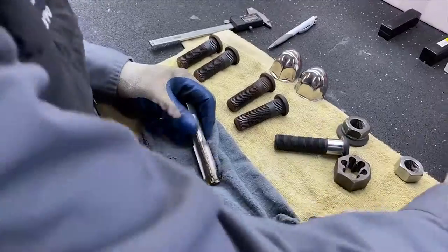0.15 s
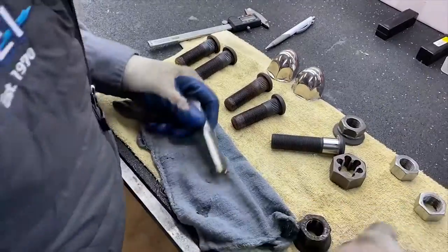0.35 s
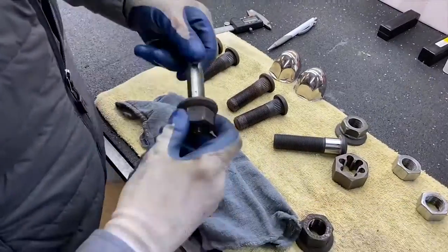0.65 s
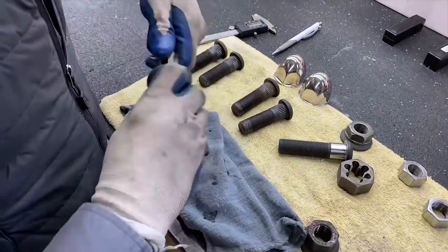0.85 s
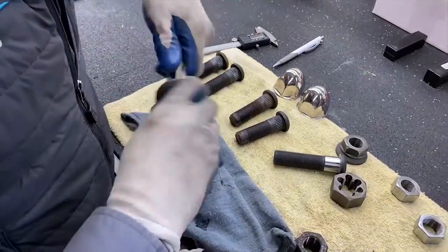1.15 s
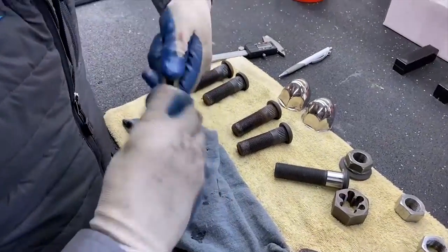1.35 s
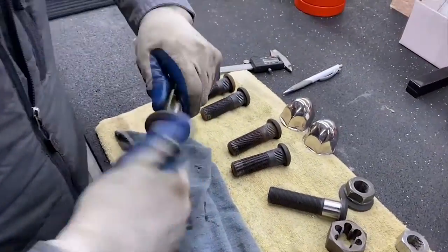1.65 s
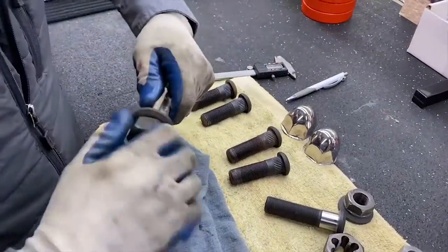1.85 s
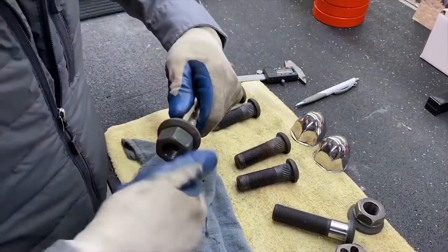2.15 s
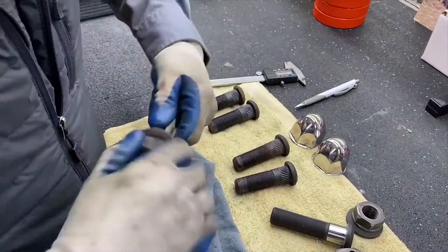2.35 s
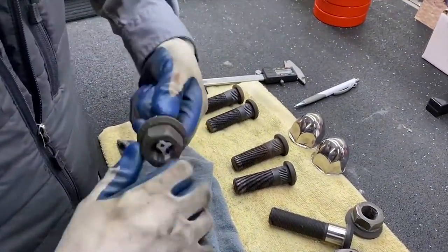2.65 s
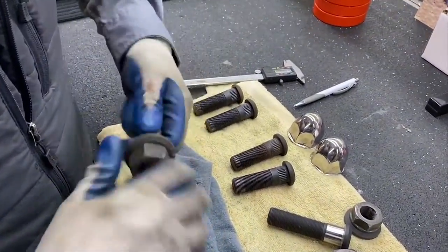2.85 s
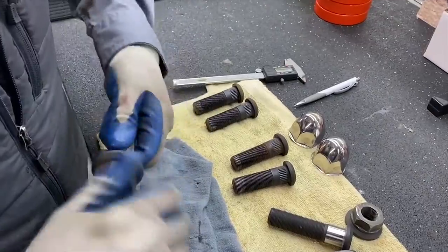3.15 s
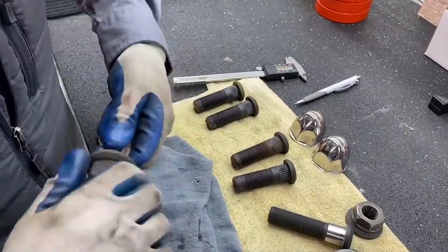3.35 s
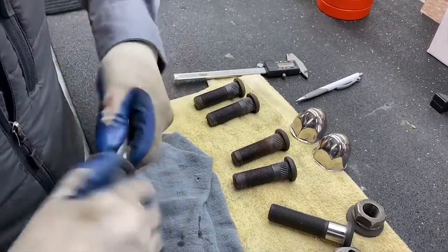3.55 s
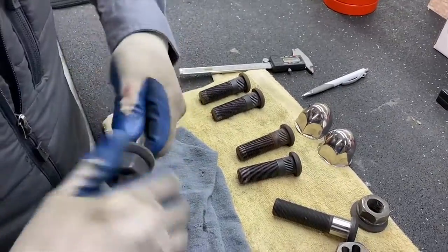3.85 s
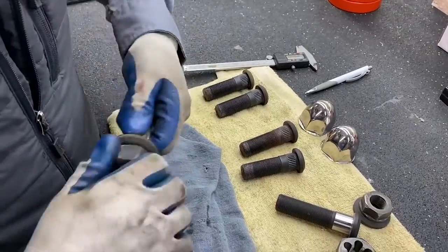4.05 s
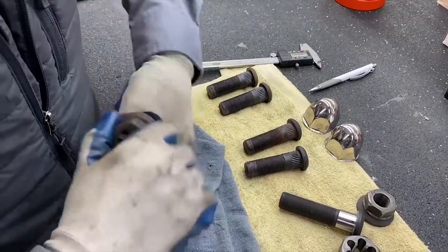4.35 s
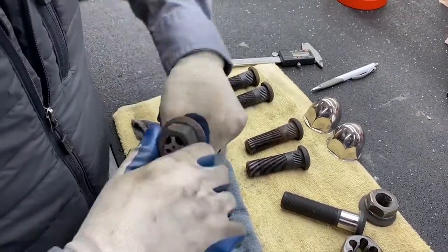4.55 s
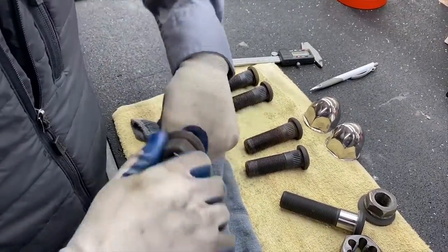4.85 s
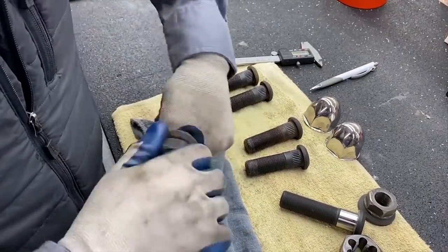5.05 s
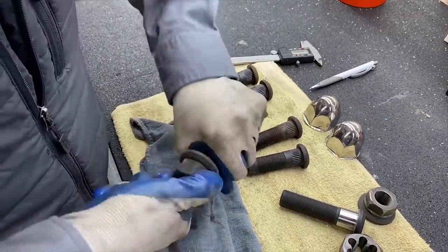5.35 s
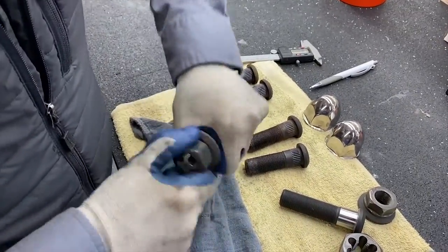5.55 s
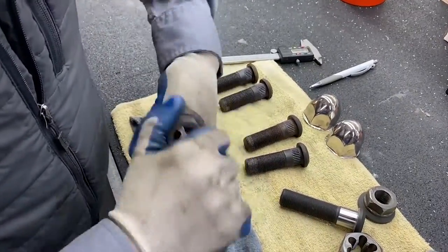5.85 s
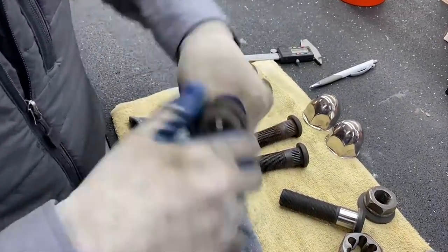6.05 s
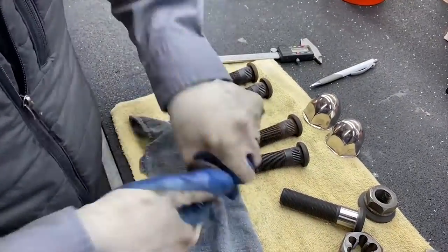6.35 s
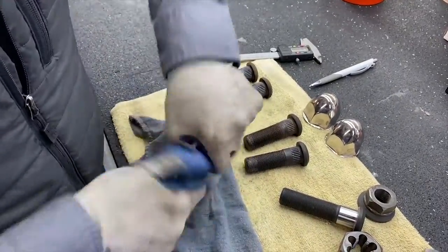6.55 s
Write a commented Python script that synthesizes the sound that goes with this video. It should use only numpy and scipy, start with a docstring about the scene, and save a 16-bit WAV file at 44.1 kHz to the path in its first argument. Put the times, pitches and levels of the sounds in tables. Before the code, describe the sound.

Close up in a workshop with steady ventilation, a glove ticks and a sleeve brushes by, then one dull bump lands on the workbench. A loose steel nut clinks twice against a thread tap and is turned by hand, making irregular damped clicks and short gritty scrapes. Gloves and sleeves swish and tick between the turns and carry on after the metal falls quiet.

```python
"""Gloved hands spin a steel nut along a thread tap over a cloth-covered workbench in a shop.
Over steady ventilation, a glove ticks, a sleeve brushes by and one dull bump bounces on the bench.
Then the loose nut knocks and grinds on the flutes, with one faint squeak; the grip damps the steel's
ring. Gloves and sleeves swish and tick between the turns and carry on after the steel falls quiet."""
import sys
import numpy as np
from scipy import signal
from scipy.fft import rfft, irfft
from scipy.io import wavfile
from scipy.ndimage import uniform_filter1d, minimum_filter1d

SR = 44100
rng = np.random.default_rng(int(sys.argv[2]) if len(sys.argv) > 2 else 0)


def put_to_file(sound):
    """Save the sound as 16-bit audio at rate SR, in the file named by the first command-line argument."""
    columns = np.atleast_2d(sound).T  # one column per channel
    safe = np.clip(columns, -1, 1)
    whole_steps = np.round(safe * 32767)
    wavfile.write(sys.argv[1], SR, whole_steps.astype(np.int16))


N = 295470


def amp(db):
    """Decibels to gain."""
    return 10 ** (np.asarray(db) / 20)


def unit(x):
    """Scales to rms 1."""
    return x / np.sqrt(np.mean(x ** 2) + 1e-20)


def unit_attack(x):
    """Scales a hit to rms 1 over its first 10 ms."""
    return x / np.sqrt(np.mean(x[:SR // 100] ** 2) + 1e-20)


def curve_at(points, hz):
    """Reads a curve on a log-frequency axis."""
    point_hz, value = np.transpose(points)
    return np.interp(np.log(hz + 1), np.log(point_hz + 1), value)


def add(mix, start_s, sound):
    """Mixes a sound in at start_s."""
    part = mix[max(round(start_s * SR), 0):][:len(sound)]
    part += sound[:len(part)]


def equalise(x, db_of_hz):
    """Filters by a level given as a function of frequency."""
    return irfft(rfft(x) * amp(db_of_hz(np.fft.rfftfreq(len(x), 1 / SR))), len(x))


def click(eq, size=2048):
    """Minimum-phase click with the given EQ curve, energy 1."""
    log_gain = np.log(amp(curve_at(eq, abs(np.fft.fftfreq(size, 1 / SR)))))
    spectrum = np.exp(np.conj(signal.hilbert(log_gain)))
    pulse = np.fft.ifft(spectrum).real[:size // 2]
    return pulse / np.linalg.norm(pulse)


def ring(modes, stretch=1, shares_db=0, size=12000):
    """Sum of dying modes, energy 1; shares_db depends on the place that is struck."""
    t = np.arange(size)[:, None] / SR
    hz, db, t60 = np.transpose(modes)
    tone = (amp(db + shares_db - 60 * t / t60) * np.sin(2 * np.pi * hz * stretch * t)).sum(1)
    return tone / np.linalg.norm(tone)


def grains(per_s, spread_db=0.5):
    """A track of random micro-contacts, as impulses of either sign."""
    chance, size, sign = rng.random(N), rng.exponential(1, N), rng.standard_normal(N)
    return (chance < per_s / SR) * amp(spread_db * np.minimum(size, 4)) * np.sign(sign)


def sprinkle(strokes, per_s, over_db, spread_db, count=24):
    """Scatters small events inside strokes, following each stroke's level; rows of start_s, level_db."""
    rows = []
    for start, end, db in strokes:
        times = start + (np.arange(count) + rng.random(count)) / per_s
        levels = db + over_db + spread_db * rng.uniform(-0.85, 1, count)
        rows += list(zip(times[times < end], levels[times < end]))
    return rows


# EQ of the moving air: freq_hz, gain_db
AIR_EQ = [(15, -75), (25, -33), (70, -1.5), (102, -0.5), (130, -3), (179, -6), (371, -14.5), (403, -16),
          (929, -12.5), (1010, -12), (1150, -14), (1930, -19.5), (4210, -21.5), (5090, -22.5), (15800, -30)]
# duct resonances: centre_hz, width_hz, level_db (before the drone's fader)
DUCT_BANDS = [(88, 15.6, -49.5), (118, 84, -55.5), (980, 137, -57.5)]
# fader ride on the low drone: time_s, relative_db
DRONE_RIDE = [(0, 0.5), (1.3, 0), (2.2, -0.5), (3.4, 5), (4.6, -2.5), (5.5, 1.5), (6.7, 1)]


def ventilation(air_db=-47, drone_trim_db=-2):
    """A bed of steady air noise with duct resonances; the low drone swells and sinks."""
    bed = amp(air_db) * unit(equalise(rng.standard_normal(N), lambda hz: curve_at(AIR_EQ, hz)))
    times, ride_db = np.transpose(DRONE_RIDE)
    swell = amp(np.interp(np.arange(N) / SR, times, ride_db - ride_db.mean()) + drone_trim_db)
    for centre, width, db in DUCT_BANDS:
        band = equalise(rng.standard_normal(N), lambda hz: -20 * np.log10(1 + ((hz - centre) / width) ** 2))
        bed += amp(db) * unit(band) * (swell if centre < 200 else 1)
    return bed


# EQ of the coated fabric: freq_hz, gain_db
GLOVE_EQ = [(200, -15), (700, 2), (1500, 0), (3000, 2), (4300, 5), (6500, 2), (8500, -0.5), (10700, -5.5),
            (12200, -13.5), (16000, -13)]
# glove tips letting go: start_s, peak_db
FINGERTIP_TICKS = [(0.1977, -26), (3.1163, -31.5), (4.4977, -25), (4.7798, -32), (5.098, -27.5),
                   (5.3839, -31.5), (5.6557, -33), (5.6765, -28), (5.962, -25.5), (5.9784, -27.5),
                   (6.6615, -28.5)]


def glove_ticks(decay_s=0.0046):
    """Coated fabric snaps as it lets go, crinkles as it slides and ticks as the fingers shift grip."""
    out, colour = np.zeros(N), click(GLOVE_EQ)
    t = np.arange(SR // 25) / SR
    crinkles = sprinkle(SWISHES, per_s=12, over_db=15.5, spread_db=7)
    handling = (2.1, 6.7, -35.5)  # start_s, end_s, level_db
    regrips = sprinkle([handling], per_s=4, over_db=0, spread_db=7)
    for start, db in FINGERTIP_TICKS + crinkles + regrips:
        snap = signal.fftconvolve(rng.standard_normal(len(t)) * np.exp(-t / decay_s), colour)
        add(out, start, amp(db) * snap / abs(snap).max())
    return out


# strokes of gloves and sleeves: start_s, end_s, level_db
SWISHES = [(0.398, 0.436, -53), (1.213, 1.259, -46), (2.093, 2.163, -52), (2.255, 2.45, -49),
           (2.325, 2.397, -46.5), (2.933, 3.009, -41.5), (3.859, 3.962, -50), (4.36, 4.407, -49.5),
           (4.875, 4.924, -48), (5.073, 5.232, -51), (5.371, 5.53, -49.5), (5.553, 5.98, -55),
           (5.719, 5.755, -40.5), (5.759, 5.791, -41.5), (5.999, 6.118, -44.5), (6.12, 6.215, -49.5),
           (6.277, 6.326, -42.5), (6.333, 6.472, -45), (6.522, 6.574, -43.5)]


def swishes(medium_db=-45.5, pivot_hz=6000, clump_db=2, rise_share=0.36, fade_share=0.35):
    """Fabric slides in clumps of fine grains; faster strokes are louder and brighter."""
    out = np.zeros(N)
    clumps = amp(clump_db * unit(uniform_filter1d(rng.standard_normal(N), size=400)))
    fibres = signal.fftconvolve(clumps * grains(per_s=6000), click(GLOVE_EQ))[:N]
    strokes = [(start, end, db, 3.5 + 0.37 * (db - medium_db)) for start, end, db in SWISHES]
    dull_sleeve = (0.36, 0.82, -53.5, -4.5)
    for start, end, db, db_per_octave in strokes + [dull_sleeve]:
        stroke = fibres[round(start * SR):round(end * SR)]
        stroke = equalise(stroke, lambda hz: db_per_octave * np.log2(np.clip(hz / pivot_hz, .1, 1.5)))
        progress = np.linspace(0, 1, len(stroke))
        ramp = np.clip(np.minimum(progress / rise_share, (1 - progress) / fade_share), 0, 1)
        add(out, start, amp(db) * unit(stroke * np.sin(np.pi / 2 * ramp) ** 2))
    return out


# the bench's low body: pitch_hz, level_db, t60_s
BENCH_MODES = [(140.5, 2.5, 0.08), (166.7, 10, 0.036), (194, -7.5, 0.075), (334, -18.5, 0.12)]
# EQ of the bump's attack: freq_hz, gain_db
CRACK_EQ = [(100, -15), (450, -3.5), (700, -1), (900, -1), (1250, 0), (1600, -14), (2200, -9.5),
            (4000, -24), (12000, -28.5), (16000, -46)]
# the bump and its rebounds: start_s, peak_db
BENCH_HITS = [(0.7385, -4.5), (0.785, -21.5), (0.811, -34)]


def bench_bump(push_s=0.0073, crack_s=0.0065, crack_db=-23, low_cut_hz=65):
    """A padded blow swells into the bench's low modes, with a brief dull crack on top."""
    out, boom = np.zeros(N), ring(BENCH_MODES)
    t = np.arange(len(boom)) / SR
    boom *= 1 - np.exp(-(t / push_s) ** 2)
    # a low cut keeps deep rumble out of the thud
    boom = signal.sosfilt(signal.butter(2, low_cut_hz, "high", fs=SR, output="sos"), boom)
    for start, db in BENCH_HITS:
        crack = signal.fftconvolve(rng.standard_normal(len(t)) * np.exp(-t / crack_s), click(CRACK_EQ))
        add(out, start, amp(db) * boom / abs(boom).max())
        add(out, start, amp(db + crack_db) * unit_attack(crack))
    return out


def chatter(length_ms, count=24):
    """Force of a touch and its thinning, weakening rebounds; long ones blur into a slip."""
    when, size = .5 * rng.exponential(1, count), rng.standard_normal(count)
    force = np.zeros(SR // 40)
    force[0] = 1
    at = np.clip(when * length_ms * SR / 1000, 0, len(force) - 1).astype(int)
    np.add.at(force, at, (length_ms / 4) ** 1.5 * size * np.exp(-when / 2))
    return force


# EQ of the dry steel-on-steel touch: freq_hz, gain_db
CLACK_EQ = [(60, -26), (200, -22), (500, -6.5), (1200, -10), (2100, -2), (2800, 2.5), (3900, 1), (4700, 0),
            (5400, 0.5), (6500, -0.5), (7400, -20.5), (10000, -30), (15500, -39)]
# nut and tap, choked by the grip: pitch_hz, level_db, t60_s
GRIPPED_MODES = [(1760, -12, .025), (2110, -8, .025), (2375, -9, .02), (2720, -2, .018), (3280, 0, .018),
                 (3668, -3, .016), (3924, -1, .018), (4240, -1, .016), (4570, -2, .011)]


def clack(modes_db=-4):
    """The dry touch together with the short answer of the held steel."""
    body = amp(modes_db) * ring(GRIPPED_MODES, shares_db=3 * rng.standard_normal(len(GRIPPED_MODES)))
    add(body, 0, click(CLACK_EQ))
    return body


# the steel's main ring, with a faint tail that escapes the grip: pitch_hz, level_db, t60_s
STEEL_MODES = [(5356, -11, .014), (5648, -6, .016), (5910, -2, .022), (5990, 0, .026), (6200, -9, .014),
               (5975, -23, .3)]
# its upper modes, a bright ping: pitch_hz, level_db, t60_s
PING_MODES = [(8440, -7, .025), (10620, -9, .03), (11480, 0, .045), (14450, -11, .03)]
# nut hitting tap: start_s, strength_db, ring_db (over the clack; high in a loose grip),
# ping_db (over the strength)
NUT_KNOCKS = [(1.6625, -9.5, 10, -23.5), (1.7663, -11.5, 20.5, -45), (1.7778, -28.5, -2, -13),
              (2.019, -33.5, 11, -30), (2.038, -31, 8, -18), (2.066, -33.5, -0.5, -24),
              (2.4743, -31, -23.5, -11.5), (2.6695, -31.5, -13.5, -27), (2.709, -29.5, 0.5, -27),
              (2.72, -21, -13, -28), (3.181, -40, -6.5, -24), (3.2609, -32, 0, -17),
              (3.298, -34.5, -18, -29), (3.3355, -32, -6.5, -33), (3.3637, -32, -24.5, -35),
              (3.4373, -36.5, -18.5, -16), (3.609, -32, -13, -37), (3.857, -34, -3.5, -26),
              (3.969, -30, -19, -31), (3.9741, -24.5, -23.5, -34), (3.9913, -27, -3.5, -32),
              (3.9942, -19, 8, -26), (4.012, -26.5, 4, -23), (4.1236, -18.5, -3, -13.5),
              (4.575, -26.5, -2.5, -26), (4.583, -28.5, -8, -29), (4.803, -42.5, -3, -22)]


def nut_knocks(catches, medium_db=-30, chatter_ms=4.6, ring_band_hz=(2500, 9000)):
    """Each knock or catch clacks and rings the steel; returns a clack stem and a ring stem."""
    clacks, rings = np.zeros(N), np.zeros(N)
    steel, ping = ring(STEEL_MODES), unit_attack(ring(PING_MODES))
    for start, db, ring_db, ping_db in NUT_KNOCKS + catches:
        # a loose nut chatters longer; harder hits settle sooner and sound brighter
        accent_db = db - medium_db
        force = chatter(chatter_ms * amp(.27 * ring_db - .3 * accent_db))
        brightness_db = 2.5 * (1 + .45 * max(accent_db, -5))
        touch = signal.fftconvolve(clack(), click([(600, -brightness_db), (4000, 0)]))
        gain = amp(db) / np.hypot(1, amp(ring_db))  # clack and ring share the energy of the blow
        add(clacks, start, gain * unit_attack(signal.fftconvolve(force, touch)))
        # the first touch feeds the ring far more than the rebounds, and alone wakes the ping
        strike = np.r_[force[0], .25 * force[1:]]
        add(rings, start, gain * amp(ring_db) * unit_attack(signal.fftconvolve(strike, steel)))
        add(clacks, start, amp(db + ping_db) * ping)
    # the ring keeps to a middle band: no bass and no top of the treble
    return clacks, signal.sosfilt(signal.butter(2, ring_band_hz, "band", fs=SR, output="sos"), rings)


# turns in which the flutes grind in the thread: start_s, end_s, level_db
GRINDING_TURNS = [(1.977, 2.015, -53), (2.011, 2.045, -43), (2.209, 2.334, -54), (2.481, 2.59, -42.5),
                  (2.666, 2.743, -46), (3.163, 3.384, -41), (3.43, 3.456, -38.5), (3.589, 3.62, -42.5),
                  (3.988, 4.019, -31.5), (4.085, 4.191, -42.5), (4.174, 4.275, -48), (4.548, 4.63, -42),
                  (4.793, 4.92, -48), (5.071, 5.217, -54.5)]


def grinding(ring_db=-7, dull_db=5):
    """Cutting edges drag on the thread: a gritty stream of tiny, soft knocks in the same steel."""
    grit, force = grains(per_s=1200), np.zeros(N)
    for start, end, db in GRINDING_TURNS:
        stroke = grit[round(start * SR):round(end * SR)]
        add(force, start, amp(db) * unit(stroke * signal.windows.tukey(len(stroke), .3)))
    body = signal.fftconvolve(clack(modes_db=-36.5), click([(1200, dull_db), (4800, 0)]))
    pressed = amp(ring_db) * ring(STEEL_MODES, stretch=1.03)  # pressure stiffens the parts: higher ring
    return sum(signal.fftconvolve(force, response)[:N] for response in (body, pressed))


def edge_catches(ring_db=-1.5, ping_db=-32):
    """An edge snags now and then while grinding; returns cues laid out like NUT_KNOCKS."""
    snags = sprinkle(GRINDING_TURNS, per_s=26, over_db=-1, spread_db=2)
    return [(start, db, ring_db, ping_db) for start, db in snags]


def squeak(start_s=2.475, length_s=0.07, top_hz=8400, level_db=-57, arch=.035, waver=.003):
    """A sticking edge sings as a turn begins; its pitch rises and falls with the pressure."""
    out, n = np.zeros(N), round(length_s * SR)
    pressure = np.sin(np.pi * np.arange(n) / n)
    jitter = unit(uniform_filter1d(rng.standard_normal(n), size=40))
    hz = top_hz * (1 - arch * (1 - pressure) + waver * jitter)
    tone = np.sqrt(pressure) * np.sin(2 * np.pi * np.cumsum(hz) / SR)
    add(out, start_s, amp(level_db) * unit(tone))
    return out


def early_reflections(x, echo_db, decay_s=0.0076, count=40):
    """Bench top, tools and body scatter the sound back within 25 ms; returns dry plus echoes."""
    t = np.arange(SR // 40) / SR
    taps = np.zeros(len(t))
    taps[rng.integers(SR // 400, len(taps), count)] = rng.standard_normal(count)
    taps *= np.exp(-t / decay_s)
    return x + amp(echo_db) * signal.fftconvolve(x, taps / np.linalg.norm(taps))[:N]


# decay of the shop's reverb: freq_hz, t60_s
SHOP_DECAY = [(120, 0.3), (600, 0.7), (3000, 0.63), (6000, 0.39), (12000, 0.22)]


def shop_reverb(send, predelay_s=.006, size=32768, count=1800):
    """Sparse reflections of random sign, each band dying at its own speed."""
    out, taps = np.zeros(N), np.zeros(size)
    taps[rng.integers(0, size, count)] = rng.choice([-1., 1.], count)
    hz, t, bands = signal.stft(taps, SR, nperseg=256)
    decay = amp(-60 * t / curve_at(SHOP_DECAY, hz)[:, None])
    tail = signal.istft(bands * decay, SR, nperseg=256)[1]
    add(out, predelay_s, signal.fftconvolve(send, tail / np.linalg.norm(tail)))
    return out


def scene():
    """A mono mix: steel, bench and cloth up close, with light reverb sends, over the ventilation."""
    clacks, rings = nut_knocks(edge_catches())
    steel = early_reflections(clacks + grinding(), echo_db=-9) + rings + squeak()
    thud = bench_bump()
    cloth = early_reflections(swishes() + glove_ticks(), echo_db=-14)
    send = amp(-17) * steel + amp(-15) * thud + amp(-8) * cloth
    return (steel + thud + cloth + shop_reverb(send) + ventilation())[None]


def record(dry):
    """A fast limiter holds the hardest knocks under full scale; a steep high cut follows."""
    ceiling, high_cut_hz = .95, 15950
    allowed = ceiling / np.maximum(abs(dry), ceiling)
    gain = uniform_filter1d(minimum_filter1d(allowed, size=61), size=61)
    high_cut = signal.firwin(511, high_cut_hz, window=("kaiser", 9), fs=SR)
    return signal.oaconvolve(dry * gain, high_cut[None], "same")


dry = scene()
out = record(dry)
put_to_file(out)
```